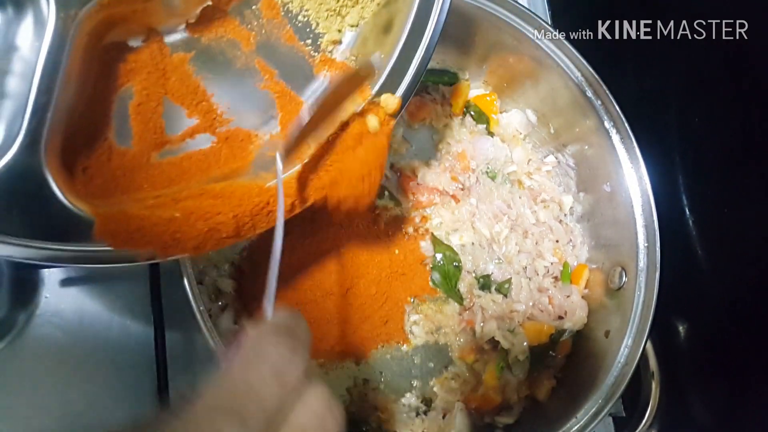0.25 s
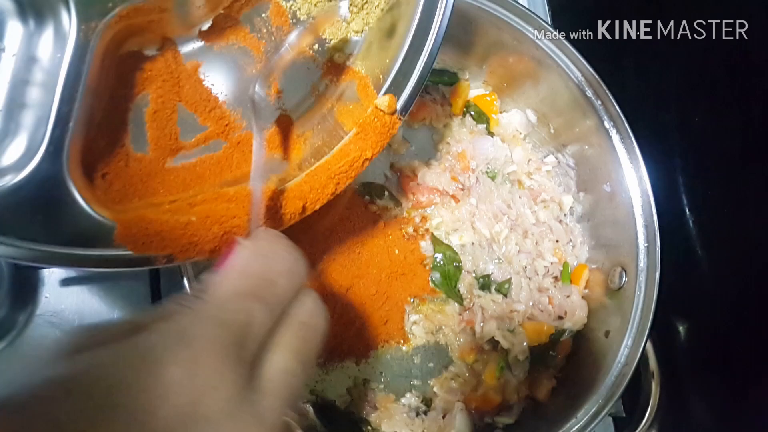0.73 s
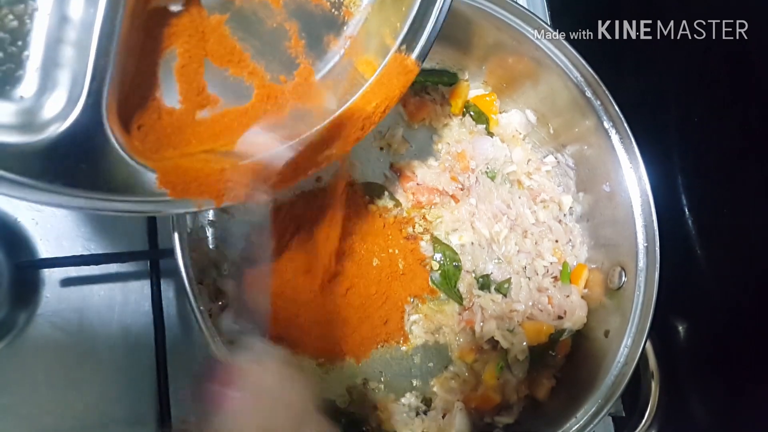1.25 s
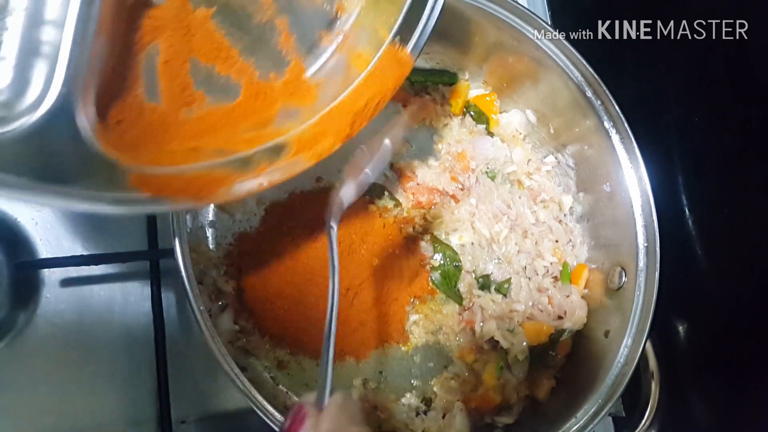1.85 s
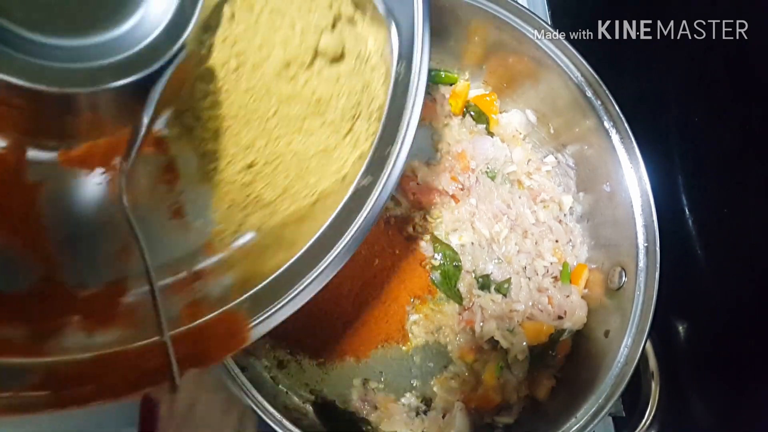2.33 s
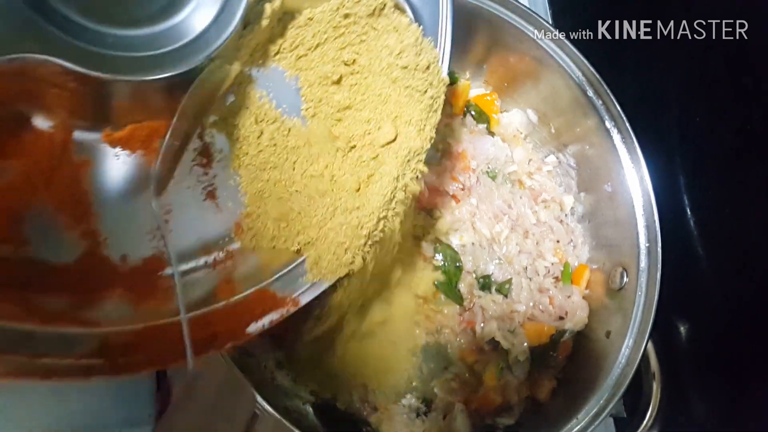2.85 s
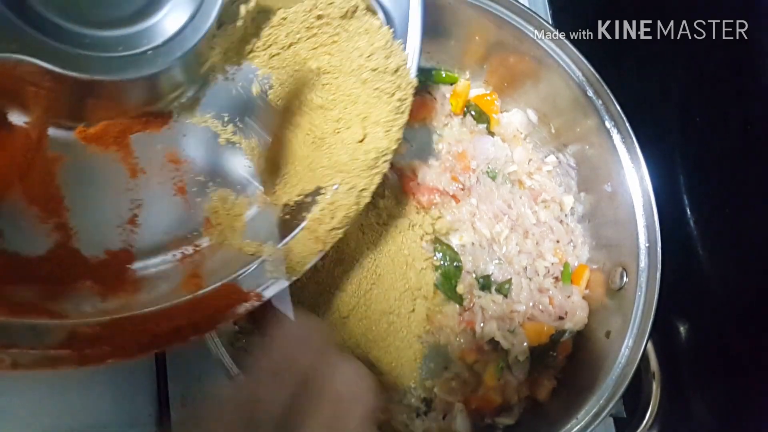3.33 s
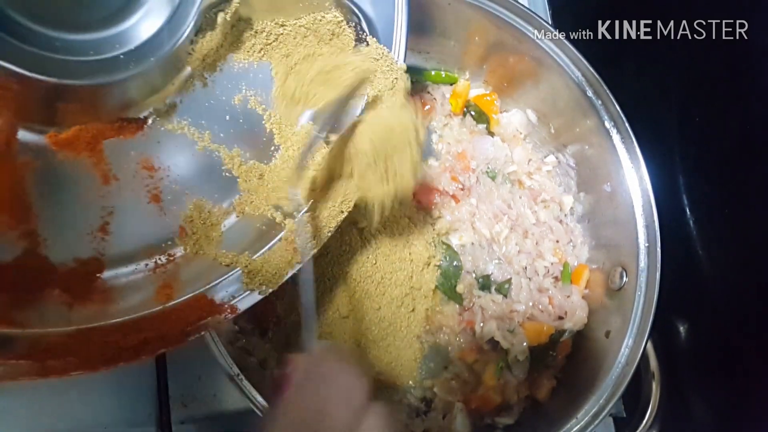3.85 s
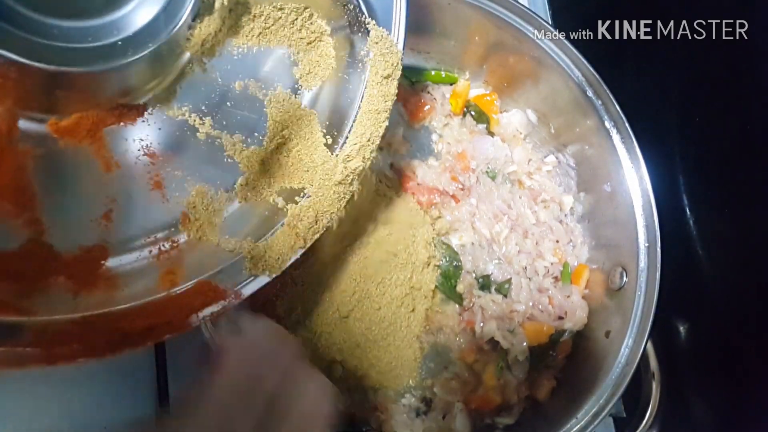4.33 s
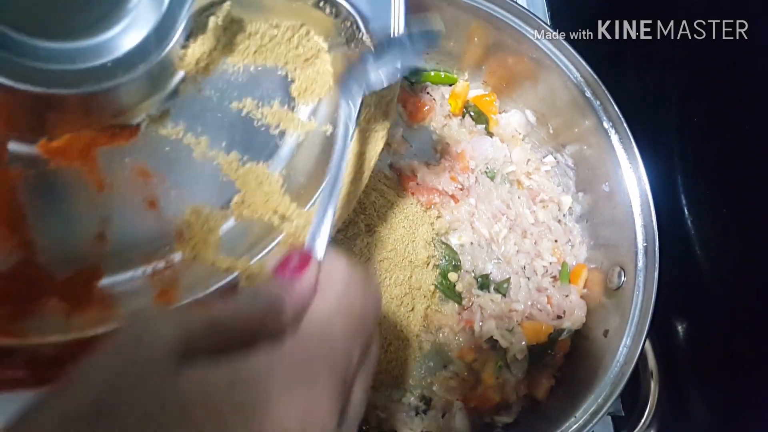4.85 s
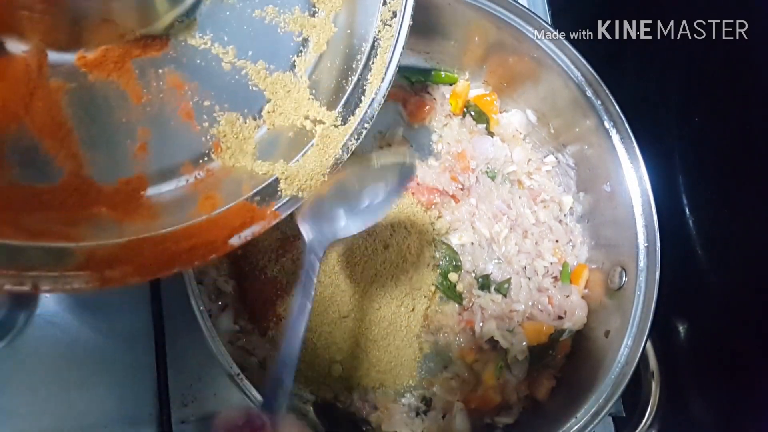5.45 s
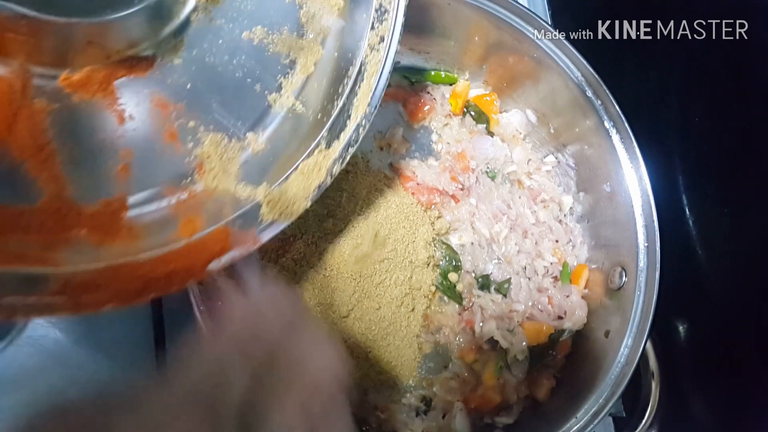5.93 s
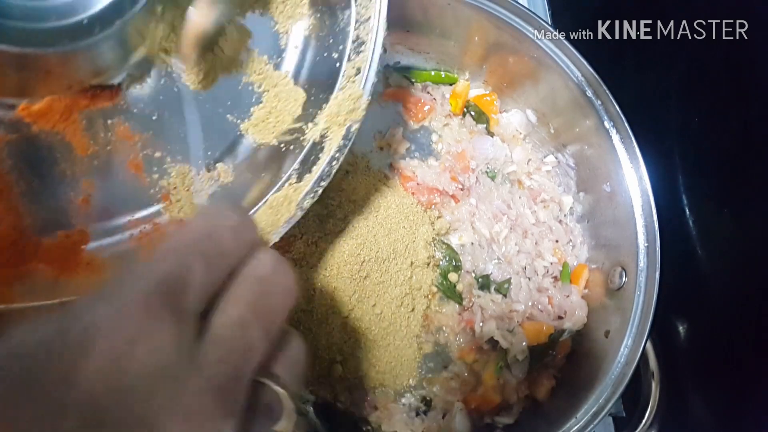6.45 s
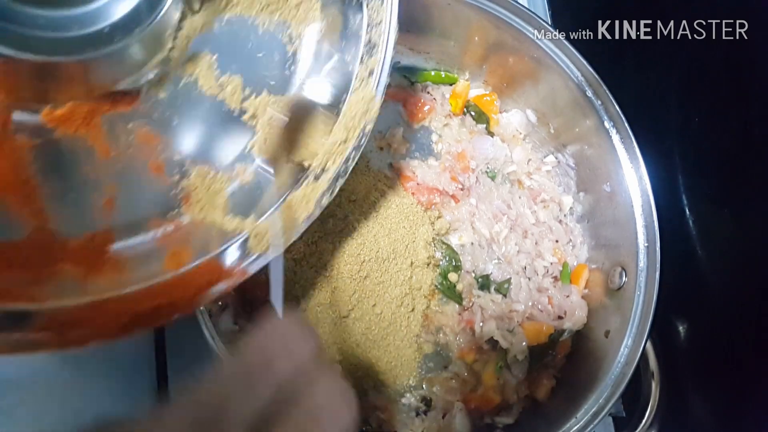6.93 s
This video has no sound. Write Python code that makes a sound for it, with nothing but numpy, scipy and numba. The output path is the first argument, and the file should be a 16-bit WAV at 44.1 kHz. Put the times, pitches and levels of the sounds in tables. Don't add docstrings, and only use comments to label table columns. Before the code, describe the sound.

A metal spoon clinks and scrapes gritty powder off a hand-held steel plate, over soft pan sizzle and a low burner hum.

```python
import sys
import numpy as np
from scipy import signal
from scipy.fft import rfft, irfft, next_fast_len
from scipy.io import wavfile
from scipy.ndimage import uniform_filter1d
from numba import njit

SR = 44100
rng = np.random.default_rng(int(sys.argv[2]) if len(sys.argv) > 2 else 0)


def generate_wav(sig):
    pcm = np.round(np.clip(np.atleast_2d(sig).T, -1, 1) * 32767).astype(np.int16)
    wavfile.write(sys.argv[1], SR, pcm)


def how_loud(loudness_db):
    steps = np.asarray(loudness_db, float) / 20
    return 10 ** steps


N = 317079

BAND_EDGES_HZ = [790, 1000, 2200]
# (time [s], favoured low ring [Hz], middle ring [Hz], top ring [Hz], left-right [dB])
SPOTS = [(0.191, 1100, 2280, 2940, 0), (0.545, 1330, 2560, 2830, 0), (0.916, 1110, 2280, 2980, 0),
         (1.225, 1440, 2300, 5150, 0.0055), (1.257, 1490, 2280, 3360, 0), (1.522, 1510, 2300, 3450, 0),
         (1.53, 1660, 2290, 3030, 0), (1.61, 1510, 2280, 3320, 0), (1.846, 1540, 3160, 4100, 0),
         (2.447, 1110, 2240, 3520, 0), (2.55, 1160, 2190, 3750, 0), (2.64, 1180, 2520, 5140, 0),
         (3.025, 1100, 2280, 4730, 0), (3.397, 1330, 2265, 4580, 0), (3.779, 1380, 2310, 4480, 0),
         (3.885, 1820, 2330, 4480, 0), (3.918, 1150, 2330, 4480, 0), (4.139, 1374, 2440, 2930, 0),
         (4.16, 1550, 2320, 3630, 0), (4.313, 1430, 3040, 4500, 0), (4.541, 1590, 2380, 5100, 0),
         (4.977, 1680, 2600, 3250, 0), (5.449, 1070, 3080, 3420, 0), (5.558, 1640, 3280, 3600, 0),
         (5.794, 1350, 2300, 4720, 0), (6.192, 1130, 2240, 4600, 0), (6.551, 1350, 2290, 2980, 0),
         (6.65, 1490, 2265, 2940, 0), (6.904, 1230, 2950, 3520, 0), (7.128, 1810, 2570, 3520, 0)]


def unit(x):
    return x / np.sqrt(np.mean(x ** 2))


def on_log(table, hz):
    points, values = np.transpose(table)
    return np.interp(np.log(np.maximum(hz, 1)), np.log(points), values)


def colour(x, spectrum):
    size = next_fast_len(N)
    hz = np.arange(size // 2 + 1) * SR / size
    gain = how_loud(on_log(spectrum, hz)) * np.minimum(hz / spectrum[0][0], 1) ** 2
    return irfft(rfft(x, size) * gain, size)[..., :N]


def stereo(source, spectrum):
    # (frequency [Hz], left-right likeness [0-1])
    likeness = [(60, 1), (130, 0.96), (290, 0.94), (640, 0.69), (1410, 0.07), (3100, 0.1), (6820, 0.03),
                (15000, 0.05)]
    hz = np.geomspace(spectrum[0][0], SR / 2, num=60)
    alike = np.clip(on_log(likeness, hz), 0, .99)
    level_db = on_log(spectrum, hz)
    mid = colour(source(), np.c_[hz, level_db + 10 * np.log10(1 + alike)])
    side = colour(source(), np.c_[hz, level_db + 10 * np.log10(1 - alike)])
    return unit(np.array([mid + side, mid - side]))


def grains(share, scatter_db):
    size_db = scatter_db * np.minimum(rng.exponential(size=N), 4)
    return unit((rng.random(N) < share) * rng.standard_normal(N) * how_loud(size_db))


def walk(rate_hz):
    k = int(SR / rate_hz)
    held = np.repeat(rng.standard_normal(N // k + 1), k)
    return 2.12 * uniform_filter1d(uniform_filter1d(held, k), k)[:N]


def swell(peak_s, db, rise_s, fall_s, roundness):
    rise_s, fall_s = max(rise_s, .001), max(fall_s, .001)
    end = min(int((peak_s + 1.5 * fall_s) * SR), N)
    at = np.arange(int((peak_s - rise_s) * SR), end)
    late_s = at / SR - peak_s
    return at, db - 30 * np.maximum(-late_s / rise_s, late_s / fall_s) ** roundness


def burst(times_s, peaks_db, length_s):
    out, t = np.zeros(N + 2048), np.arange(2048) / SR
    for s, db in zip(times_s, peaks_db):
        shake = .09 * rng.standard_normal(len(t)) * np.exp(-t / length_s)
        shake[0] = 1
        out[int(s * SR):][:len(t)] += how_loud(db) * shake
    return out[:N]


def above_edges(rows):
    out = []
    for x, hz in zip(rows, [130, *BAND_EDGES_HZ]):
        cut = signal.butter(3, .85 * hz, "high", fs=SR, output="sos")
        out.append(signal.sosfilt(cut, x))
    return np.array(out)


@njit
def ring(blows, rub, band, spot, gain, pose, pole, turn):
    out = np.zeros((2, blows.shape[1]))
    for k in range(len(pole)):
        z, soft = 0j, np.sqrt(1 - abs(pole[k]) ** 2)
        for i in range(blows.shape[1]):
            push = blows[band[k], i] + soft * rub[band[k], i]
            z = z * pole[k] + gain[spot[i], k] * push + 1e-18
            w = turn[pose[i], k]
            out[0, i] += z.imag * w.real + z.real * w.imag
            out[1, i] += z.imag * w.real - z.real * w.imag
    return out


def poles_and_ears(hz, t60_s, apart_hz, count):
    scatter = 0.93 * rng.standard_normal(len(hz)) + rng.standard_normal((count, len(hz)))
    apart = np.minimum(hz / apart_hz, 1) ** 2
    gap_rad = apart * (1.61 * scatter - 2.2) - .3
    pole = np.exp((2j * np.pi * hz - np.log(1000) / t60_s) / SR)
    return pole, np.exp(.5j * gap_rad)


def stove():
    # (frequency [Hz], density [dB per Hz])
    hum_spectrum = [(15, -17), (25, -5), (48, -13.5), (90, -3), (236, 1), (305, -5), (637, -1.5), (694, -6),
                    (1050, -6.5), (1160, -51), (1500, -6.5), (1950, -15), (3300, -120)]
    # (frequency [Hz], density [dB per Hz])
    sizzle_spectrum = [(410, -56), (700, 0.5), (1050, -3.5), (1160, 0.5), (1560, -7.5), (1780, -1.5),
                       (3730, -1), (5770, -2.5), (7810, -9.5), (11000, -8.5), (15100, -15.5), (15700, -5),
                       (16400, -73)]
    # (time [s], level [dB])
    shade = [(0, 2), (.7, 0), (1.5, 0.5), (1.76, 2), (1.9, -8), (2.4, -4.5), (2.6, -6.5), (2.9, -6),
             (3.1, 2), (3.8, 0.2), (4.7, 1.5), (5.1, -2), (5.65, -3.5), (6.1, -2), (6.4, 0.5), (7.19, 0.5)]
    hum_db, sizzle_db, hum_shading = -50.5, -43, 1.09

    def crackle():
        return rng.standard_normal(N) + .6 * uniform_filter1d(grains(.02, 3.0), size=2)

    shade_db = np.interp(np.arange(N) / SR, *np.transpose(shade))
    hum = stereo(lambda: rng.standard_normal(N), hum_spectrum)
    hum = hum * how_loud(hum_db + hum_shading * shade_db + 1.05 * walk(11))
    sizzle = stereo(crackle, sizzle_spectrum)
    return hum + sizzle * how_loud(sizzle_db + shade_db + .8 * walk(12))


def contact(hz, db, band, taps_s):
    # (time [s], second low ring [Hz], second high ring [Hz], ring the fingers dull or leave brighter [Hz])
    grips = [(0.191, 1420, 2720, 3600), (0.545, 1437, 2270, 1100), (0.916, 1640, 2600, 3720),
             (1.225, 1820, 4200, 1100), (1.257, 1680, 3040, 4500), (1.522, 1660, 3300, 3800),
             (1.53, 1470, 2460, 3500), (1.61, 1844, 2830, 5770), (1.846, 1180, 5560, 2480),
             (2.447, 1490, 4900, 2580), (2.55, 1300, 4830, 3520), (2.64, 1180, 3800, 3520),
             (3.025, 1250, 3830, 5820), (3.397, 1100, 2400, 1900), (3.779, 1700, 2440, 3700),
             (3.885, 1150, 2470, 3700), (3.918, 1780, 2470, 3700), (4.139, 1580, 3720, 2650),
             (4.16, 2030, 5240, 3300), (4.313, 1580, 2200, 2470), (4.541, 1160, 2600, 3120),
             (4.977, 1480, 2340, 2000), (5.449, 1810, 3230, 6120), (5.558, 1820, 3260, 2600),
             (5.794, 1630, 2520, 1110), (6.192, 1340, 2230, 3220), (6.551, 1600, 2460, 5150),
             (6.65, 1970, 2400, 3670), (6.904, 1144, 2520, 1395), (7.128, 1250, 3150, 1395)]
    # (time [s], low rings [dB], middle rings [dB], top ring [dB], ring dulled (-) or brighter (+) [dB])
    leans = [(0.191, -3, 5.8, 7.4, -2), (0.545, 4.5, 3.7, 2.8, -15), (0.916, -1, 5.7, 11, -7),
             (1.225, 14, 11, 5, -13), (1.257, 6, 6.9, 12, -9), (1.522, 13, 4.1, 4.6, -6),
             (1.53, 8, 5.6, 3.8, 7), (1.61, 13.5, 8.2, 10, 6), (1.846, 3, 1.7, 3.8, -14),
             (2.447, 8, 3, 6.5, -3), (2.55, 0, 15, 16, -4), (2.64, 0.5, 3.5, 5, -6),
             (3.025, 12, 8, 7.2, 8.5), (3.397, 7, 3, 3, -10), (3.779, 3.5, 3.3, 2.6, -4),
             (3.885, 2, 3, 3, -2), (3.918, 10, 2.6, 3, -4), (4.139, 7.5, 5.5, 8.4, -21),
             (4.16, 8, 5.8, 3.5, -12), (4.313, 10, 6.8, 6, -14), (4.541, 2, 3.6, 2.3, -11),
             (4.977, 4.5, 1.8, 3.3, -6), (5.449, 4, 9.2, 9, 12.5), (5.558, 23, 5.8, 5.5, -6),
             (5.794, 3, 3.3, 13, 4), (6.192, 3.5, 4.1, 8.3, -4), (6.551, 6, 6.5, 3.7, 6),
             (6.65, -1, 7.3, 6, -11), (6.904, 3, 5.3, 1.9, -7), (7.128, 19, 3, 3, -6)]
    slide_s = .03
    spot_db, favour_octaves = 2, 0.087
    starts_s = np.sort(np.r_[np.arange(0, N / SR, slide_s), taps_s])
    stroke = np.maximum(np.searchsorted(taps_s, starts_s, "right") - 1, 0)
    rings_hz = np.c_[np.array(SPOTS)[:, 1:-1], np.array(grips)[:, 1:]]
    lean_db = np.array(leans)[:, [1, 2, 3, 1, 2, 4], None]
    octaves = np.log2(hz / rings_hz[..., None])
    near_db = (lean_db * np.exp(-(octaves / favour_octaves) ** 2)).sum(axis=1)
    sides = rng.choice([-1, 1], near_db.shape)
    gain = (sides * how_loud(db + near_db))[stroke]
    gain = gain * how_loud(spot_db * rng.standard_normal((len(starts_s), len(hz))))
    for b in set(band):
        gain[:, band == b] /= np.linalg.norm(gain[:, band == b], axis=1, keepdims=True)
    spot = np.searchsorted(starts_s * SR, np.arange(N) + 1) - 1
    return gain, spot, stroke[spot]


def drag_levels():
    # (time [s], high ring [dB], fall [s], low ring re high [dB], bowl note re high [dB])
    skids = [(0.192, -32.5, 0.034, 12, -11), (0.548, -24.5, 0.2, 0, 1.5), (0.922, -42.5, 0.092, 14.5, 2),
             (1.228, -42, 0.099, 11, 3), (1.256, -21.5, 0.15, 1, -7), (1.528, -23.5, 0.24, 1, -1),
             (1.614, -22.5, 0.042, 5, 3), (1.849, -17.5, 0.21, -1, -6), (3.027, -34.5, 0.085, 4.5, 4),
             (3.432, -42, 0.21, 7.5, 3), (3.784, -31.5, 0.1, 4, -8), (4.143, -22, 0.22, -1.5, -27),
             (4.547, -16, 0.12, -2, -3), (4.669, -29, 0.034, 0, 4.5), (4.981, -17.5, 0.28, -5.5, -8),
             (5.45, -23.5, 0.2, -11, -27), (5.796, -23, 0.09, -2, 1), (6.191, -30, 0.22, -5.5, -19),
             (6.551, -23, 0.1, 0, -6), (6.908, -16, 0.14, -9.5, -15)]
    # (fastest [s], high ring [dB], rise [s], fall [s], grit hiss re high [dB])
    sweeps = [(0.24, -38, 0.022, 0.099, -15), (0.6, -36, 0.039, 0.084, 2), (0.995, -33, 0.07, 0.096, -1),
              (1.322, -33.5, 0.27, 0.038, -3), (1.61, -27, 0.15, 0.051, -9.5), (1.9, -19, 0.04, 0.03, -20),
              (2.449, -53.5, 0.01, 0.048, 13), (2.57, -40, 0.15, 0.64, -15.5),
              (2.696, -39.5, 0.16, 0.049, 1.5), (3.1, -28.5, 0.072, 0.049, 1.5),
              (3.56, -44, 0.05, 0.055, -6), (3.8, -43.5, 0.025, 0.066, 8), (3.89, -40, 0.19, 0.26, -11),
              (4.24, -29.5, 0.15, 0.1, 0.5), (4.34, -31, 0.14, 0.1, -8), (4.619, -33.5, 0.062, 0.024, 7),
              (5.086, -30, 0.087, 0.12, 0.5), (5.146, -27.5, 0.056, 0.033, -6.5),
              (5.5, -36, 0.063, 0.023, -5), (5.55, -29, 0.056, 0.058, -7), (5.862, -30, 0.046, 0.099, -1),
              (6.223, -40, 0.057, 0.042, 9), (6.658, -43, 0.054, 0.032, 7.5), (6.73, -41, 0.082, 0.063, -9),
              (6.96, -26, 0.057, 0.11, -34), (7.165, -47, .06, .03, -18)]
    skid_bite_s, skid_grit_db, skid_roundness = 0.0047, -17.5, 1.12
    sweep_low_db, sweep_bowl_db, sweep_roundness = -2.5, -14, 1.03
    body_db, bowl_trim_db = -15, -4
    pushes = []
    for s, db, fall_s, low, bowl in skids:
        push = swell(s, db, skid_bite_s, fall_s, skid_roundness)
        pushes.append((push, low, bowl, skid_grit_db))
    for s, db, rise_s, fall_s, grit in sweeps:
        push = swell(s, db, rise_s, fall_s, sweep_roundness)
        pushes.append((push, sweep_low_db, sweep_bowl_db, grit))
    power = np.zeros((5, N))
    for (at, db), low, bowl, grit in pushes:
        rows_db = np.array([low + body_db, bowl + bowl_trim_db, low, 0, grit])
        power[:, at] += how_loud(db + rows_db[:, None]) ** 2
    return np.sqrt(power)


def glints(hiss):
    t60_s, glint_db, spread_db = 0.014, 0, 1.5
    t, out = np.arange(2048) / SR, 0
    share = how_loud(6.0 * np.array([walk(14) for _ in range(3)]))
    for part in share / np.linalg.norm(share, axis=0):
        hz = 4000 + 11500 * rng.random((45, 1))
        size = how_loud(spread_db * rng.standard_normal((2, len(hz))))
        rings = size @ np.sin(2 * np.pi * hz * t) * np.exp(-np.log(1000) * t / t60_s)
        rings = rings / np.linalg.norm(rings, axis=1, keepdims=True)
        out = out + signal.oaconvolve(part * hiss, rings, axes=1)[:, :N]
    return (hiss + how_loud(glint_db) * out) / np.hypot(1, how_loud(glint_db))


def plate_modes():
    # (frequency [Hz], level [dB], t60 [s])
    clear = [(488, 3, 0.053), (885, 0.5, 0.2), (1020, -8, 0.056), (1132, 1.5, 0.21), (1230, 4, 0.42),
             (1395, 5, 0.072), (1440, -3.5, 0.098), (1550, -10, 0.077), (1660, 0.5, 0.15),
             (1797, 1.5, 0.099), (2000, -5, 0.35), (2290, 9.5, 0.088), (2270, -19, 0.07), (2573, 8, 0.083),
             (2963, 8.5, 0.085), (3110, -5, 0.063), (3180, -7, 0.033), (3520, 9, 0.081), (3740, 7.5, 0.074),
             (3820, 3, 0.1), (4340, -32, 0.2), (4574, 8, 0.026), (4684, -6.5, 0.064), (5180, 5, 0.068),
             (5600, -17, 0.36), (6450, -8, 0.046)]
    # (frequency [Hz], level [dB])
    crowd_spectrum = [(250, -9.5), (500, -5), (640, -3), (770, 1.5), (810, -7), (980, -9), (1100, 2.5),
                      (1600, -3), (2060, 2), (2300, 0), (2750, 0), (3100, 1), (3700, -1.5), (4500, -6),
                      (6000, -5), (7500, -18.5)]
    hz = 250 + 7250 * np.sort(rng.random(size=240)) ** 1.3
    t60_s = 0.047 * how_loud(3.0 * np.clip(rng.standard_normal(len(hz)), -2, 2))
    return np.r_[clear, np.c_[hz, on_log(crowd_spectrum, hz), t60_s]].T


def spoon():
    # (time [s], peak [dB], bowl note re peak [dB], low ring re peak [dB], high ring re peak [dB])
    taps = [(0.190, -3.5, -4.5, -9, -10), (0.544, 2.5, -7.5, -9, -12.5), (0.916, -12.5, 7.5, -9.5, -8.5),
            (1.224, -5, -1, -4, -9.5), (1.257, -12, -3.5, 6, -11), (1.522, -7.5, -5, -1, -10),
            (1.53, -10, -16, 2, -27), (1.61, -17, -4.5, -13, -4), (1.846, -2, -12.5, -2, -2.5),
            (2.446, -19.5, -24, -9.5, -5), (2.55, -44, -20, -9, -1), (2.64, -48, -20, -9, -3),
            (3.025, -11.5, -4, 1, -18), (3.396, -10.5, -12, -5, -23), (3.778, -21.5, -13, -6, -7),
            (3.885, -27, -20, -4, -3), (3.918, -34, 0, -12, -14), (4.139, -4, -7, -3, -14),
            (4.16, -14, -20, -4, -16), (4.313, -32, -34, -13, -4), (4.542, 4, -16.5, -4.5, -12.5),
            (4.977, -7, -9, 2.5, -0.5), (5.448, -8, -19.5, -7.5, -7.5), (5.558, -26, -18, -3, -12),
            (5.794, -8, -5, -3, -22), (6.191, -18, -21, -1, -5), (6.551, -8.5, -9, -2, -27),
            (6.65, -9.5, -26, -9, -17), (6.904, -2.5, -25, -15, -2.5), (7.128, -35, -22, 6, -15)]
    # (time [s], extra thud [dB], deep thump re thud [dB])
    flat = [(0.191, 14.5, 1), (0.544, 12.5, -2), (0.916, 11, -1), (1.224, 13.5, -1), (1.61, 12, -8),
            (1.846, -3, 0), (3.025, 17.5, -3.5), (3.396, 13, 13), (3.778, 16.5, -12), (4.139, 12.5, 10.5),
            (4.542, 11, 10), (4.977, 7, 5), (5.449, 10.5, -3), (5.794, 8, 5.5), (6.191, 10, 0),
            (6.551, 15, 1), (6.65, 7.5, -11), (6.904, 18.5, -6)]
    # (frequency [Hz], density [dB per Hz])
    grit = [(4240, 7), (7200, 1.5), (9910, 2.5), (10800, 2), (14900, -2), (15700, -4), (16000, -50),
            (16400, -87)]
    chatter_s, grip_t60_s = 0.0031, .165
    thud_db, thud_per_db = -35.5, -0.06
    thump_hz, thump_db = 337, 26.5

    hz, db, t60_s = plate_modes()
    band = np.searchsorted(BAND_EDGES_HZ, hz)
    s, peak, bowl, low, high = np.transpose(taps)
    thud = thud_db + (thud_per_db - 1) * peak
    deep = np.zeros(len(s))
    for flat_s, extra_db, deep_db in flat:
        tap = np.argmin(abs(s - flat_s))
        thud[tap] += extra_db
        deep[tap] = deep_db
    gain, spot, stroke = contact(hz, db, band, s)
    blows = above_edges([burst(s, peak + rel - 3, chatter_s) for rel in (thud, bowl, low, high)])

    slide = drag_levels() * how_loud(0.83 * walk(70) + 1.22 * walk(200))
    scrape = unit(rng.standard_normal(N) + 0.31 * grains(0.018, 2.9))
    rub = above_edges(slide[:-1] * scrape * how_loud(3.0))
    hiss = stereo(lambda: rng.standard_normal(N) + .5 * grains(.03, 3.0), grit)
    hiss = hiss * how_loud(1.2 * walk(70) + .8 * walk(160))

    tick = colour(blows[-1], grit) * how_loud(-2.5)
    shove = above_edges([burst(s, peak + thud + deep - 3, chatter_s)])[0]
    thump_low = signal.butter(2, thump_hz, fs=SR, output="sos")
    thump = signal.sosfilt(thump_low, shove) * how_loud(thump_db)
    ears = poles_and_ears(hz, np.clip(t60_s, .01, grip_t60_s), 1420.0, count=len(s))
    plate = ring(blows, rub, band, spot, gain, stroke, *ears)
    pan_db = np.array(SPOTS)[stroke, -1]
    return (plate + glints(slide[-1] * hiss) + tick + thump) * how_loud(np.array([pan_db, -pan_db]) / 2)


def pops():
    # (time [s], peak [dB], centre [Hz])
    bubbles = [(0.452, -32, 3420), (0.7814, -34, 3450), (1.1667, -43.5, 4140), (1.4165, -30, 3020),
               (1.4697, -27.5, 3760), (1.506, -29, 3500), (2.757, -47, 900), (2.80, -42, 700),
               (2.9452, -39, 1140), (3.2178, -29.5, 1210), (3.273, -32, 3470), (3.556, -33.5, 1140),
               (4.7994, -38, 810), (4.9463, -32.5, 980), (5.3548, -34, 4360), (5.3926, -44, 4930),
               (5.6838, -38.5, 810), (5.71, -35, 3770), (6.031, -35, 3100), (6.075, -35, 3000),
               (6.097, -34.5, 3300), (6.1268, -41, 810), (6.31, -33.5, 900), (6.5218, -40, 880),
               (6.776, -31, 5450), (6.8245, -33.5, 1150)]
    out, t = np.zeros((2, N)), np.arange(256) / SR
    for (s, db, hz), lag in zip(bubbles, rng.integers(0, 12, len(bubbles))):
        for ear in range(2):
            pop = np.sin(2 * np.pi * hz * t) + 0.43 * rng.standard_normal(len(t))
            start = int(s * SR) + lag * (1 - ear)
            out[ear, start:][:len(t)] += how_loud(db + 12.0) * pop * np.exp(-t / 0.0004)
    return out


def bump():
    # (time [s], peak [dB])
    knock = [
        (4.664, -35),
    ]
    # (frequency [Hz], level [dB], t60 [s])
    rim = [(200, -22, 0.099), (233.6, -4, 0.12), (240, -15, 0.1), (403, -19, 0.045), (490, 23, 0.028),
           (700, 12.5, 0.17), (810, 21, 0.061), (980, 17.5, 0.11), (1100, 12, .04), (1820, 12, 0.085)]
    # (strongest [s], level [dB], rise [s], fall [s])
    rock = (4.72, -24, .07, .14)
    rock_below_hz = 300
    hz, db, t60_s = np.transpose(rim)
    blow = above_edges(burst(*np.transpose(knock), 0.0018)[None])
    cut = signal.butter(2, rock_below_hz, "high", fs=SR, output="sos")
    blows = signal.sosfilt(cut, np.repeat(blow, repeats=2, axis=0))
    rub = 0 * blows
    at, rock_db = swell(*rock, 2.2)
    rub[0, at] = how_loud(rock_db) * rng.standard_normal(N)[at]
    first = np.zeros(N, np.int64)
    band = (hz > rock_below_hz).astype(np.int64)
    gain = (how_loud(db - 7.0) * (-1) ** np.arange(len(hz)))[None]
    ears = poles_and_ears(hz, t60_s, 2500., count=1)
    return ring(blows, rub, band, first, gain, first, *ears)


def kitchen(x):
    t60_s, tail_db = 0.27, -8
    t = np.arange(SR // 3) / SR
    tail = rng.standard_normal((2, len(t))) * np.exp(-np.log(1000) * t / t60_s) * (t > .003)
    tail = tail * how_loud(tail_db) / np.linalg.norm(tail, axis=1, keepdims=True)
    return x + signal.fftconvolve(x, tail, axes=1)[:, :N]


def scene():
    # (frequency [Hz], left minus right [dB])
    ears = [(10, -2.5), (300, -2), (1000, 0), (2000, -2), (3300, 1), (4400, 0), (6300, 7), (7300, 1),
            (12000, -2)]
    left, right = kitchen(spoon() + bump() + pops()) + stove()
    half = np.array(ears) * [1, .5]
    return np.array([colour(left, half), colour(right, half * [1, -1])])


def top_cut(x):
    return signal.sosfilt(signal.butter(12, 16200, fs=SR, output="sos"), x)


def record(dry):
    top = signal.ellip(6, .3, 40, 15250, fs=SR, output="sos")
    low = signal.butter(2, 45.3, "high", fs=SR, output="sos")
    rounded = np.tanh(1.1 * dry) / 1.1
    mix = signal.sosfilt(np.r_[top, low], rounded)
    return top_cut(mix)


dry = scene()
out = record(dry)
generate_wav(out)
```